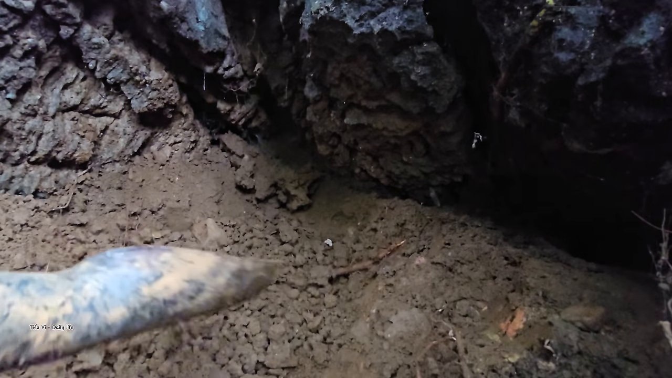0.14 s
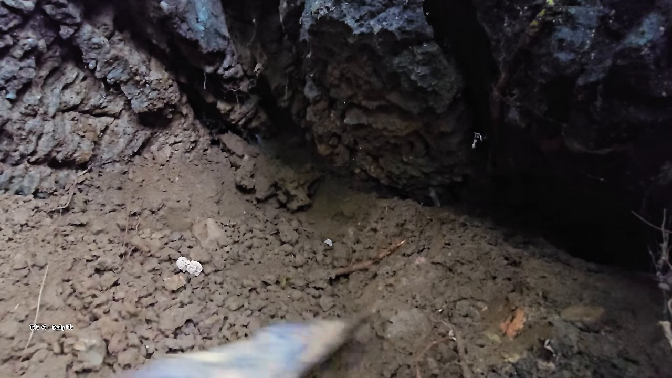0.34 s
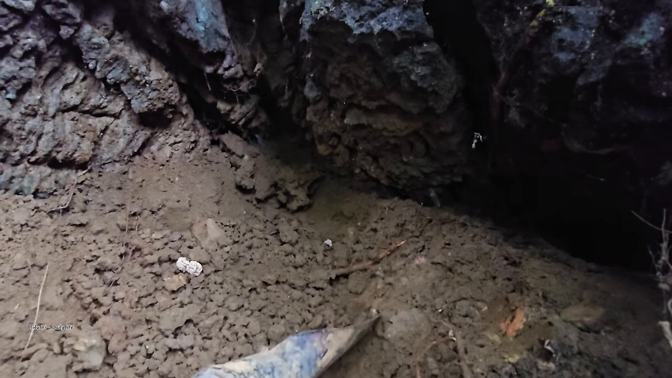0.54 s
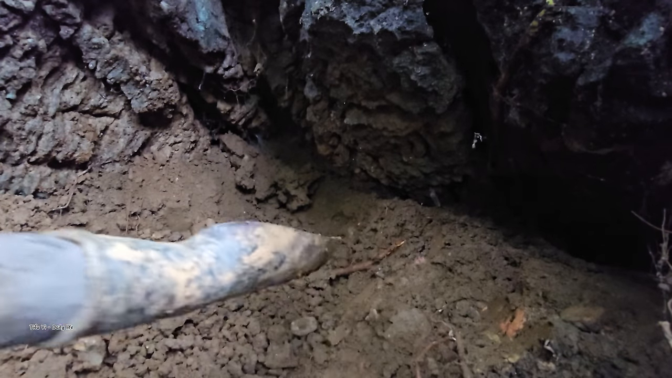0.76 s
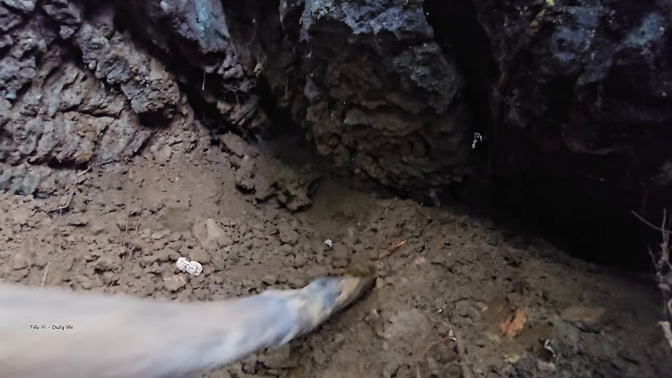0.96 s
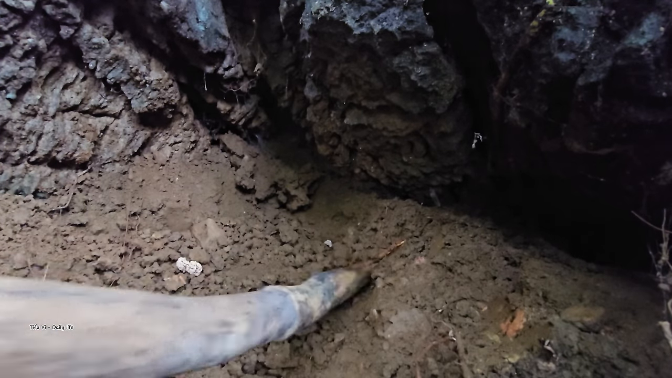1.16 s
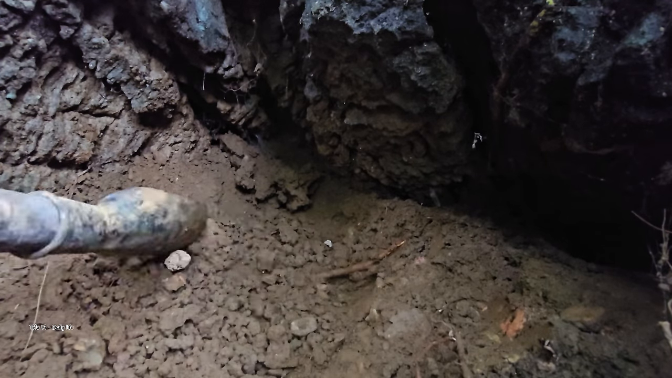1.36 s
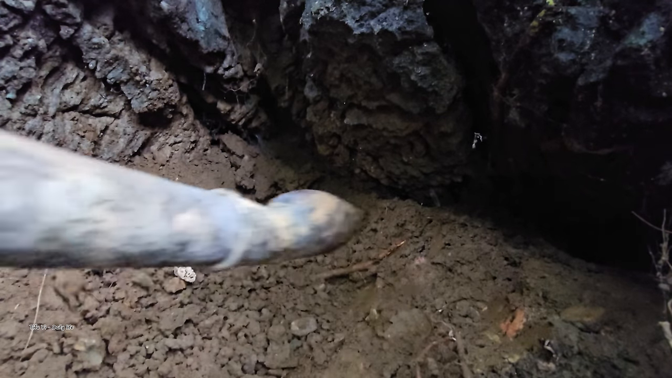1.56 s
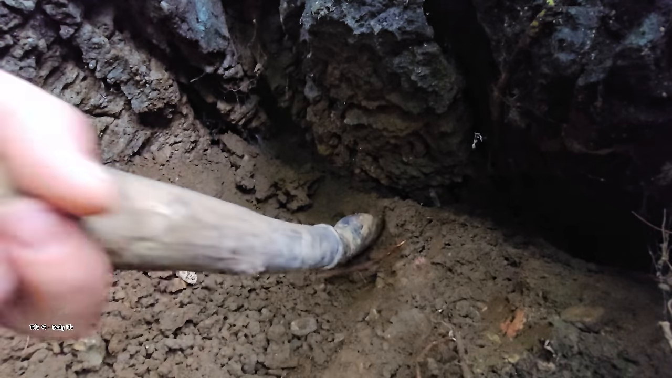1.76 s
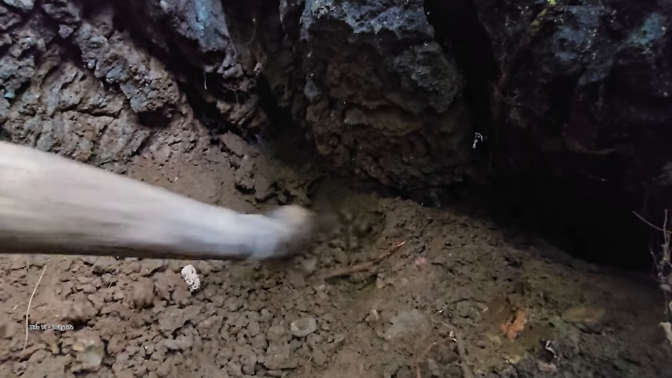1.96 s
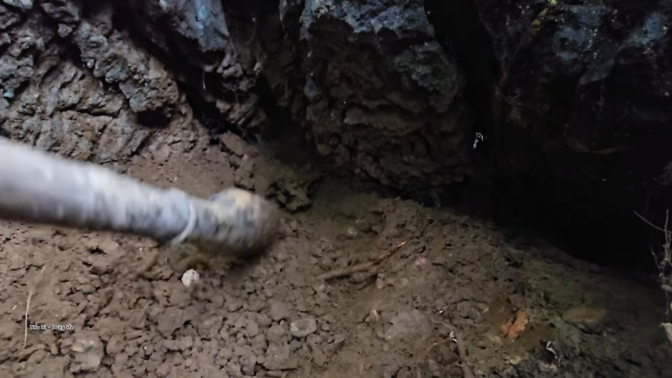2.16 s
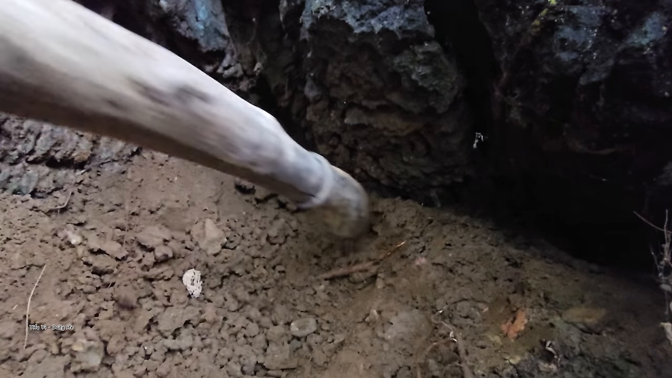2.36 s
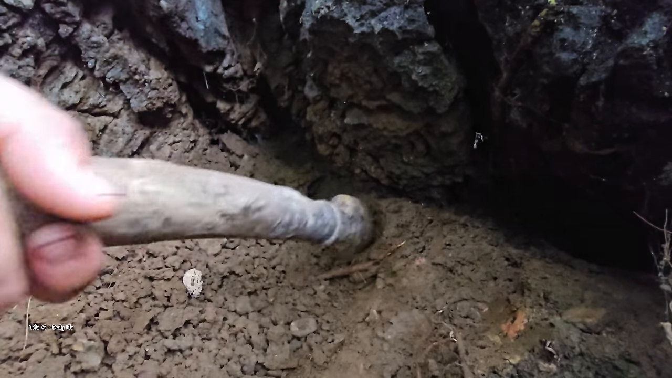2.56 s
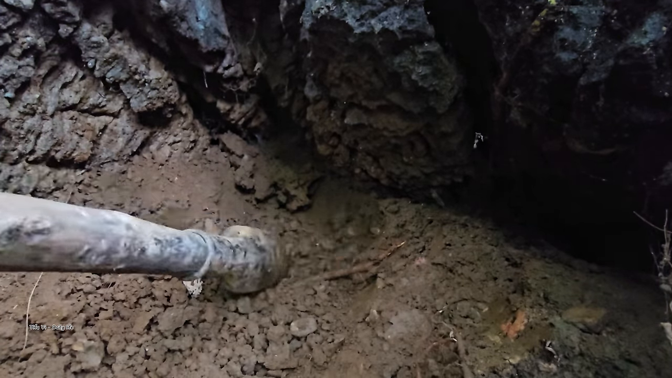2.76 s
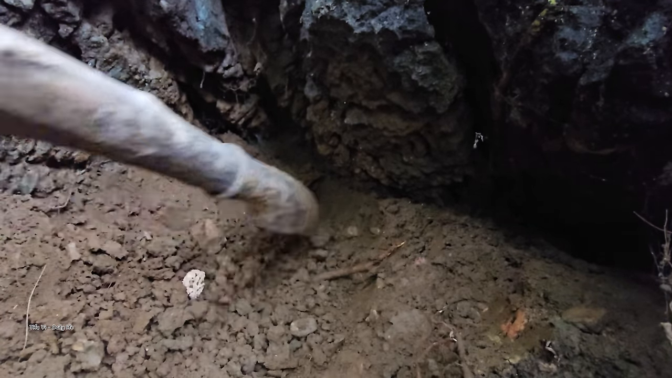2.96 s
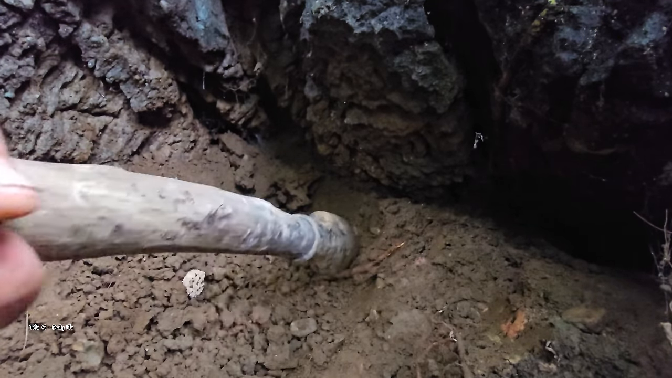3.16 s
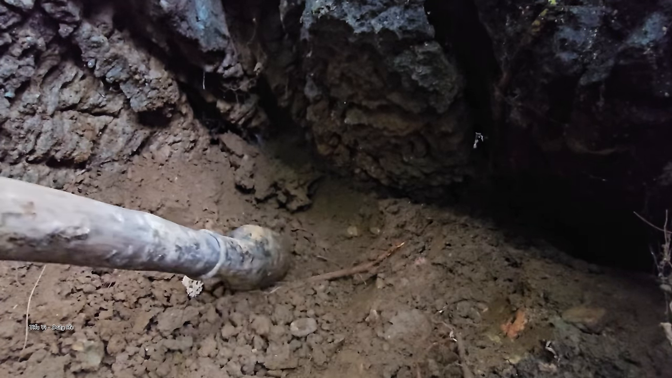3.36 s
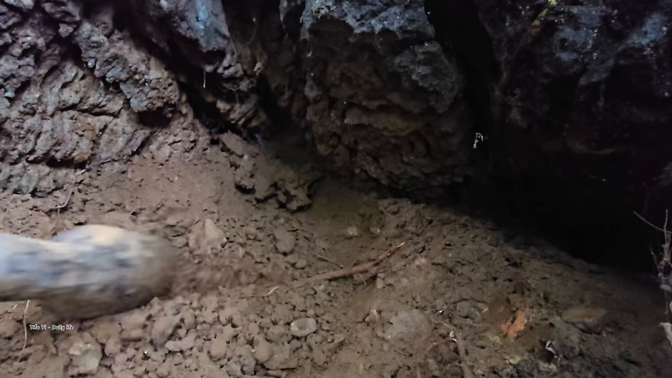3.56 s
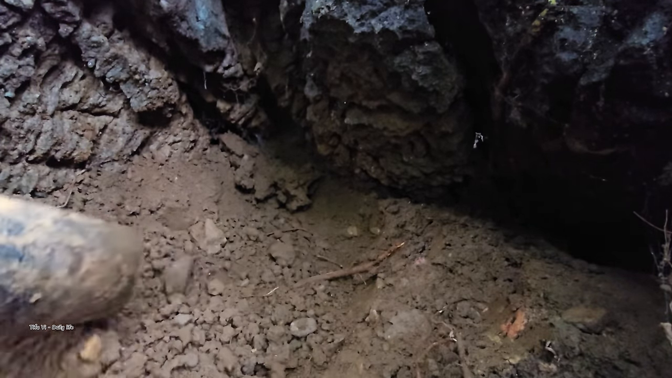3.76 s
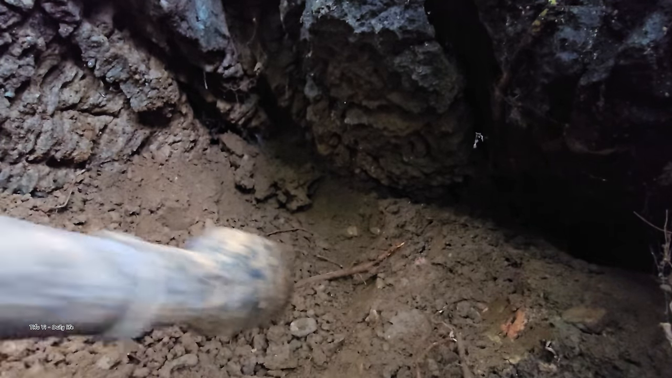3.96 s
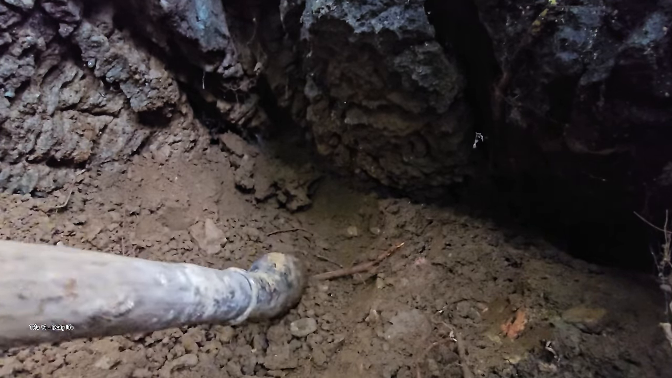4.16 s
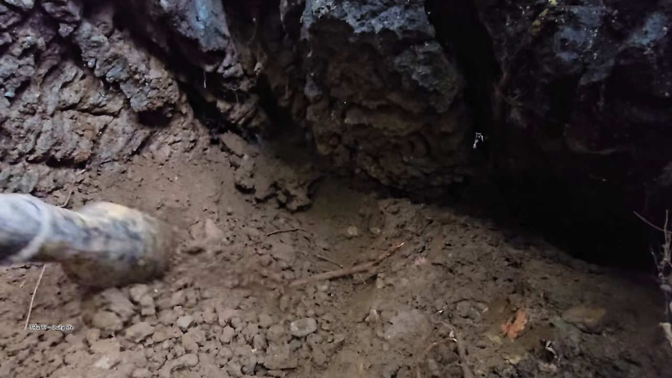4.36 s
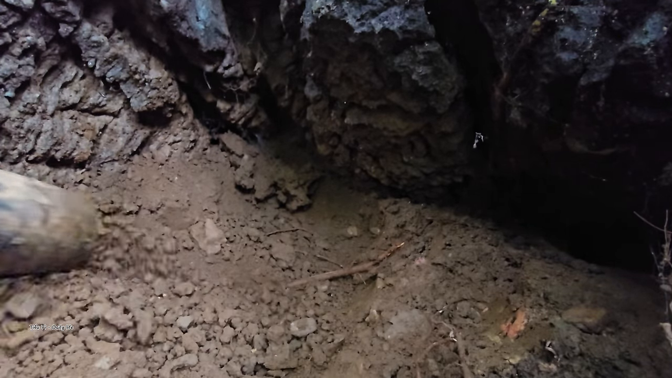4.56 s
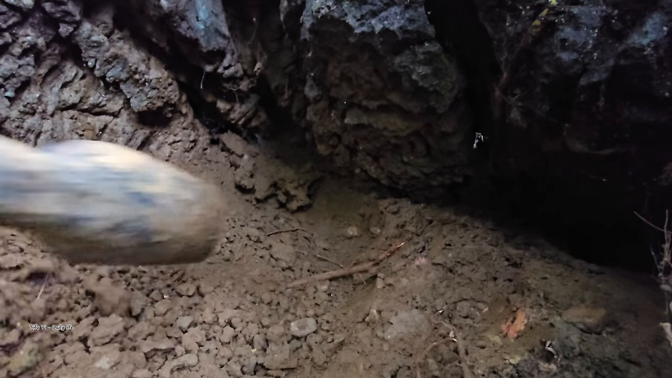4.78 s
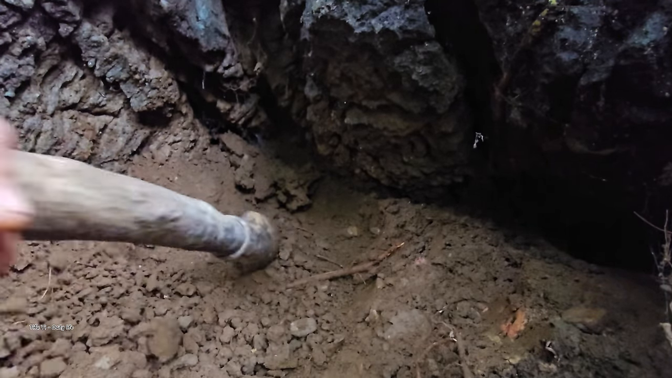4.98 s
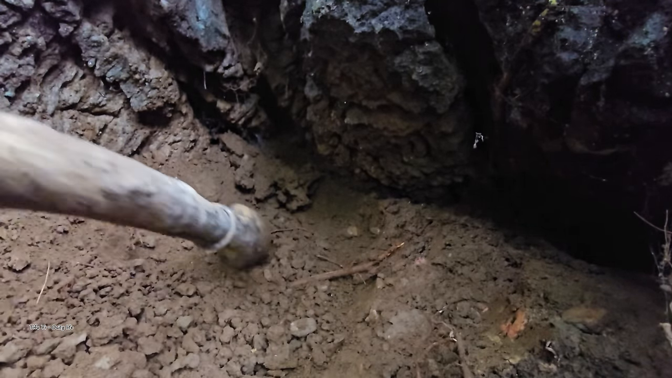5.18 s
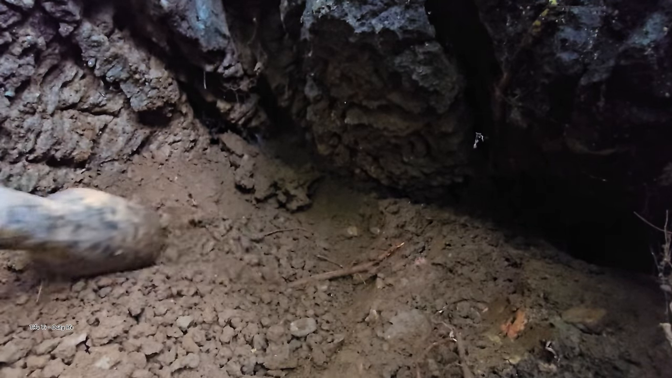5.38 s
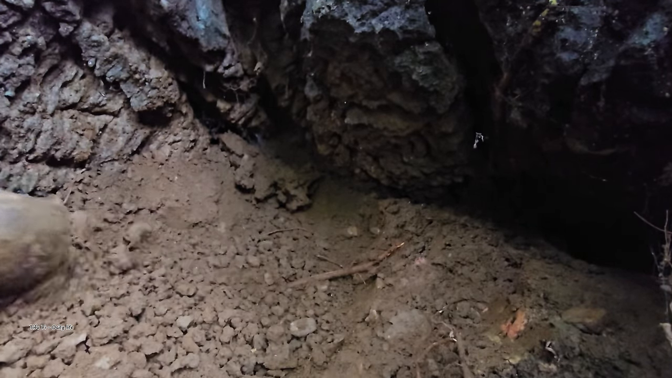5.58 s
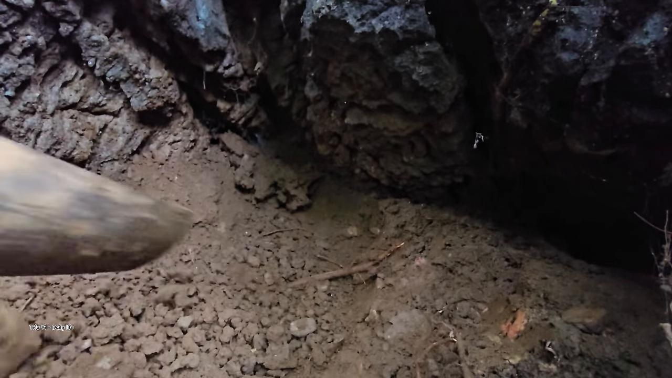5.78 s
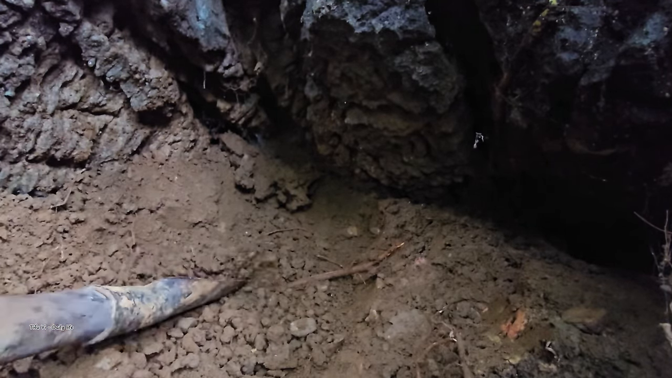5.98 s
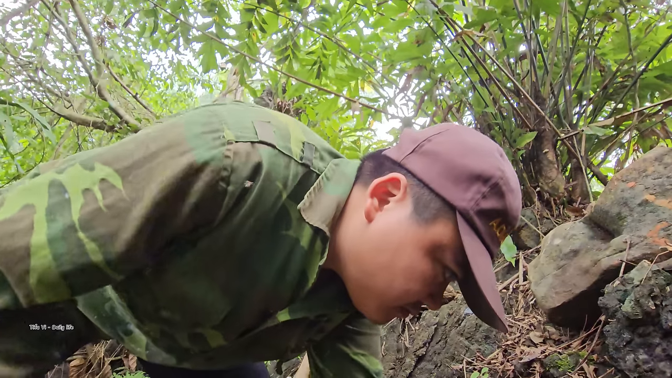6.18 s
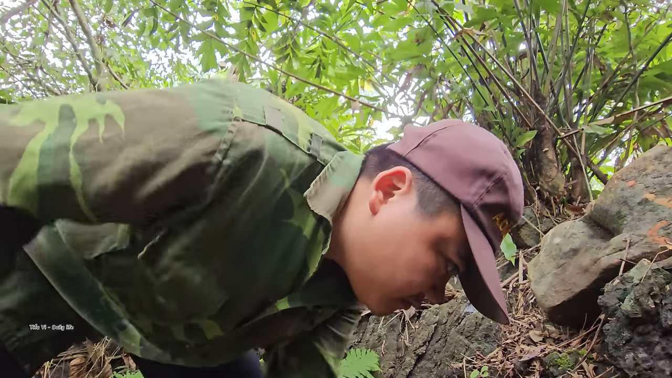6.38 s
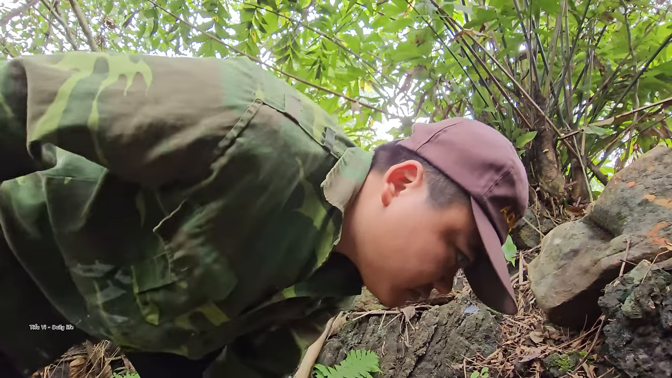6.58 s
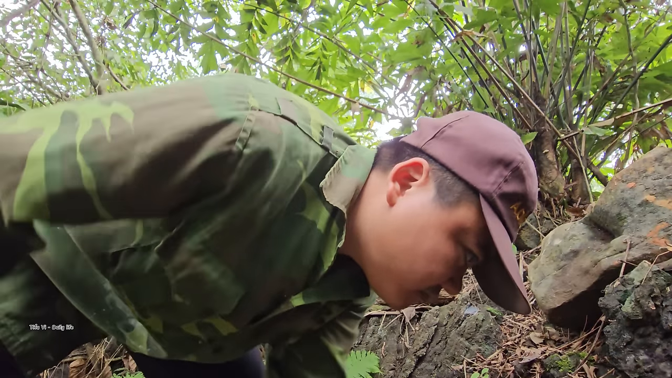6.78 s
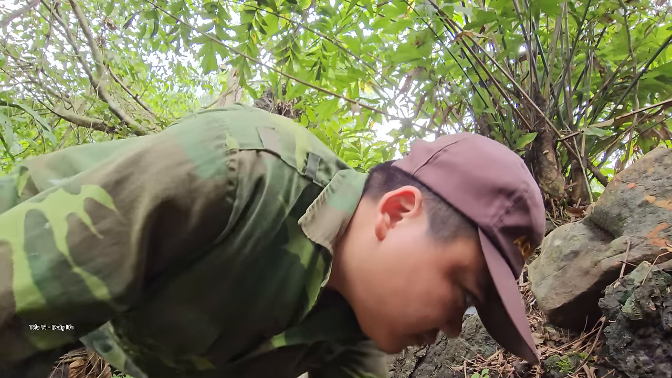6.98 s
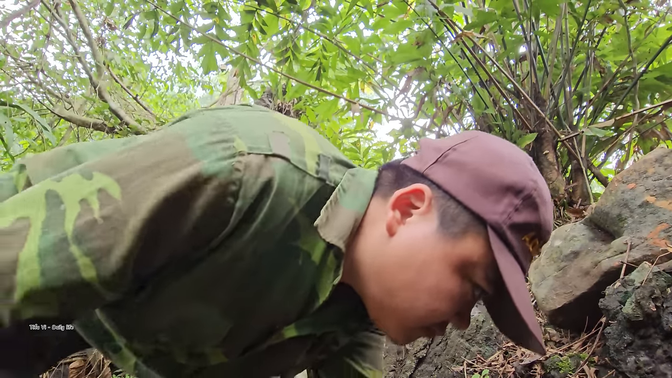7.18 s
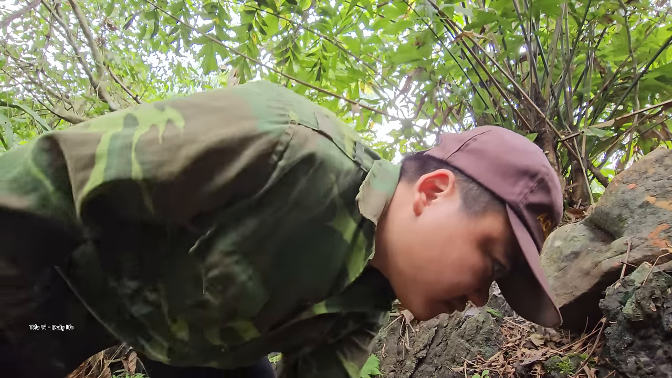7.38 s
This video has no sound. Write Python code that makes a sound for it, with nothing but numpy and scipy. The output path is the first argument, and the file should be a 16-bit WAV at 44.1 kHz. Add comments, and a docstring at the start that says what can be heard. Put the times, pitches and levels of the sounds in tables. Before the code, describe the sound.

A steel hoe chops and scrapes stony soil in uneven bursts, gritty crunches, clinks and low thumps, over a very faint forest hush.

```python
"""A soft scrape and a crunch come first: a steel hoe in stony soil, heard from inside a rocky hollow; then,
after a short silence, the microphones stand beside the digger. Blows burst as crushed grit, ring modes of
stone, blade (later rock) and shaft, and thump the ground; drags are clumped noise grains with hissing grit
and ticking pebbles. A distant bird, a trilled falling tone, calls once over the coloured noise of forest hush."""
import sys
import numpy as np
from scipy import signal
from scipy.fft import rfft, irfft
from scipy.io import wavfile
from scipy.ndimage import uniform_filter1d

SR = 44100
rng = np.random.default_rng(int(sys.argv[2]) if len(sys.argv) > 2 else 0)


def transcribe(u):
    """Save the signal u as a 16-bit wav file named by the first command-line argument.

    u: samples, shape (n,) or (channels, n), limited to [-1, 1]; the rate is SR.
    q: integer samples, one column per channel.
    """
    v = np.clip(np.atleast_2d(u).T, -1, 1)
    q = np.round(v * 32767).astype(np.int16)
    wavfile.write(sys.argv[1], SR, q)


N = 327663
SILENCE_START_S, SILENCE_END_S = 6.07, 6.163  # parts the hollow from the place beside the digger


def gain_of(db):
    """Amplitude factor of a level in dB."""
    return 10 ** (np.asarray(db) / 20)


def evened(x):
    """Scales x to a root mean square of one."""
    return x / np.sqrt(np.mean(x ** 2) + 1e-20)


def read(points, hz):
    """Reads a curve of (frequency, value) points along a logarithmic frequency axis."""
    f, value = np.transpose(points)
    return np.interp(np.log(hz + 1), np.log(f + 1), value)


def add(mix, s, sound):
    """Adds a sound to the mix from s seconds on, cut at the end of the mix."""
    part = mix[..., round(s * SR):][..., :sound.shape[-1]]
    part += sound[..., :part.shape[-1]]


def coloured(x, points):
    """Filters x by a spectrum, scaled so that white noise keeps its power."""
    gain = evened(gain_of(read(points, np.fft.rfftfreq(x.shape[-1], 1 / SR))))
    return irfft(rfft(x) * gain, x.shape[-1])


def ring(modes, t, spread_db=0.):
    """Impulse response of a struck body: a sum of sine modes that die away exponentially."""
    hz, db, t60 = np.transpose(modes)[:, :, None]
    level_db = db + np.reshape(spread_db, (-1, 1)) - 60 * t / t60
    return (gain_of(level_db) * np.sin(2 * np.pi * hz * t)).sum(0)


def gritty(count, size_db, clump):
    """Two unrelated carriers of the same uneven grains: sizes scatter, and grains come in clumps."""
    clumps = evened(uniform_filter1d(rng.standard_normal(count), int(clump), mode="wrap"))
    return evened(gain_of(size_db * clumps) * rng.standard_normal((2, count)))


# colour of crushed earth in its three parts, dull to bright: (frequency [Hz], relative density [dB per Hz])
SOIL_COLOUR = [(150, -11), (300, -8), (600, -8.5), (1000, -8), (1500, -18.5), (3000, -60.5)]
SCRAPE_COLOUR = [(600, -54.5), (1200, -8), (2000, -1.5), (2800, -1), (4000, 0.5), (5500, -4), (7000, -15),
                 (10000, -39)]
GRIT_COLOUR = [(3500, -54.5), (5500, -9), (7000, -0.5), (10000, -5.5), (12000, -6.5), (16000, -12)]
LEAD_S = .035  # crushing begins this long before the blow


def crunch(soil_db, grit_db, hz, t60, lead_db):
    """Crushed grains swell as the edge sinks in, then die away, partly heard through the ringing stone."""
    t = np.arange(8000) / SR
    after = t - LEAD_S
    # earth gives way first, then stone
    sinking = gain_of(lead_db + 60 * after / 0.049) + gain_of(60 * after / 0.0045)
    dying = gain_of(-60 * after / max(t60, .01))
    shape = np.where(after < 0, np.minimum(sinking, 1), dying)
    grains = gritty(count=len(t), size_db=1.0, clump=30.0)
    earth = coloured(grains, SCRAPE_COLOUR) + gain_of(soil_db) * coloured(grains, SOIL_COLOUR)
    burst = shape * (earth + gain_of(grit_db) * coloured(grains, GRIT_COLOUR))
    stone_mode = ring([(hz, 0, .015)], t[:1500])
    stone_mode = stone_mode[None] / np.linalg.norm(stone_mode)
    stone = signal.fftconvolve(shape * grains, stone_mode, axes=1)[:, :len(t)]
    return burst + gain_of(-4.0) * stone


# modes of the steel blade: (frequency [Hz], relative level [dB], t60 [s])
BLADE_MODES = [(1620, -6, .04), (1870, -2, .04), (2050, -14, .09), (2145, 0, .06), (2930, -8, .04),
               (3750, -2, .045), (4530, -5, .04), (5510, -7, .04), (5860, -8, .04), (6750, -10, .04),
               (7154, -12, .1), (8570, -12, .03), (11350, -14, .03)]
# modes of the rock struck after the silence: (frequency [Hz], relative level [dB], t60 [s])
SLAB_MODES = [(620, -12, .06), (795, -10, .06), (930, -12, .06), (1390, -5, .06), (1680, -5, .06),
              (2310, 0, .09), (2770, -9, .05), (3600, 0, .09), (4720, -3, .05), (5350, -5, .05)]
RING_DB = -17.5  # blade or rock re crunch


def knock(s, db, hz):
    """The first crack of the stone, and the blade or rock modes it excites."""
    t = np.arange(8000) / SR
    crack = gain_of(db - 13.5) * ring([(hz, 0, .012)], t)
    modes = BLADE_MODES if s < SILENCE_START_S else SLAB_MODES
    octaves_away = abs(np.log2(np.transpose(modes)[0] / hz))
    # modes near the stone's pitch win
    return crack + gain_of(db + RING_DB) * ring(modes, t, -5. * octaves_away)


# modes of the ground, each blow's draw scaling pitch and decay: (frequency [Hz], relative level [dB], t60 [s])
GROUND_MODES = [(132.3, -3, 0.11), (177.5, -17, 0.17), (258, -16.5, 0.085)]
# deep modes of the ground: (frequency [Hz], relative level [dB], t60 [s])
DEEP_MODES = [(78, -0.5, 0.19), (43, -8, 0.13)]


def ground_thump(thump_db, deep_db):
    """A short push smooths the onset of the dying ground modes."""
    t = np.arange(14000) / SR
    push = np.hanning(int(0.0034 * SR))
    shallow = gain_of(thump_db) * ring(GROUND_MODES, t * rng.uniform(.92, 1.2))
    deep = gain_of(deep_db) * ring(DEEP_MODES, t)
    return signal.fftconvolve(shallow + deep, push / push.sum())


# blade meets stone or clod: (time [s], crunch peak [dB], soil puff [dB re crunch], grit [dB re crunch],
# stone pitch [Hz], thump [dB], deep thump [dB], crunch t60 [s], lead-in [dB re crunch])
BLOWS = [(0.044, -21, -13, -21, 3700, -45, -44, 0.018, -45),
         (0.208, -43, -17, 5, 5570, -78, -57, 0.021, -35),
         (.39, -7.5, -4, -3, 5660, -5.5, -8.5, .041, -24.5),
         (.622, -29.5, -16, -9.5, 1590, -66, -51, 0.054, -9.5),
         (0.953, -17.5, -5.5, 1, 3600, -9.5, -38, 0.066, -18.5),
         (.964, -14, -12.5, 0.5, 6670, -20, -31.5, 0.062, -18),
         (0.975, -13, -6.5, 5, 7640, -36.5, -18.5, .051, -20.5),
         (1.001, -3, -19, -6, 3960, -17, -30.5, 0.053, -4),
         (1.145, -31, -20.5, -5, 1790, -39, -59, 0.086, -22),
         (1.188, -25.5, -1.5, -1, 4520, -29, -44.5, .042, -37),
         (1.342, -42, -8.5, -7.5, 2410, -51.5, -63, 0.11, -20.5),
         (1.763, -13, -14.5, 1, 4200, -42.5, -22, 0.06, -9),
         (1.831, -39, -15, -7, 3950, -70, -76, 0.035, -25),
         (2.002, -14.5, -13, 0.5, 4970, -29, -53.5, .04, -32),
         (2.019, -19.5, -14.5, -4.5, 4300, -13, -57, 0.054, -9),
         (2.05, -24.5, -9, 2.7, 4700, -20, -44, 0.06, -28),
         (2.094, -23, -36.5, -6.5, 5660, -48, -63, 0.087, -25),
         (2.437, -9, -10, -21, 2020, -30.5, -41, 0.036, -27),
         (2.456, -11, -6.5, -12.5, 3030, -27, -53, 0.047, -31),
         (2.48, -19, -15.5, -11.5, 3300, -27, -27, 0.055, -16),
         (2.57, -29.5, -1, -6, 3820, -36, -45, 0.084, -7),
         (2.633, -26.5, -10.5, 2, 5900, -40, -49, 0.048, -18),
         (2.653, -15.5, -10.5, -1.5, 1895, -21.5, -48, 0.074, -3),
         (2.703, -18, -8.5, -4.5, 1940, -43, -49, .052, -14),
         (2.725, -24, -29.5, -3, 2040, -45, -38, 0.066, -21),
         (2.876, -44.5, -23, -19, 1662, -67, -68.5, 0.057, -10),
         (3.097, 0, -30, -8.5, 1930, -3.5, -17, 0.015, -22.5),
         (3.149, -22.5, -29.5, -3, 3740, -44, -64, .046, -13),
         (3.176, -19, -19, 3, 7500, -57, -63.5, 0.044, -35),
         (3.186, -13, -8, 0.5, 7430, -32.5, -47, 0.05, -32),
         (3.195, -19, -8.5, -8, 2140, -26.5, -40, 0.12, -18),
         (3.213, -22, -6.5, -18, 1900, -41, -56, .093, -33),
         (3.243, -20, -5, -7.5, 1920, -26, -26.5, 0.11, -10),
         (3.43, -33.5, -20, -17, 1840, -63, -58, .065, -22),
         (3.487, -28.5, -7, -3, 4530, -53.5, -70, 0.047, -22),
         (3.513, -23, -31.5, -1.5, 4600, -45, -53, 0.07, -26),
         (3.534, -19.5, -29.5, 1.5, 4400, -36.5, -41, 0.023, -22),
         (4.028, -26.5, -6, 2.5, 4580, -57, -47.5, 0.085, -8.5),
         (4.058, -28.5, -16, -2.5, 1950, -18, -28, 0.14, -7.5),
         (4.283, -7, -35.5, -9, 1920, -18.5, -47.5, 0.05, -31),
         (4.319, -8, -20, -6.5, 1920, -14.5, -49, 0.056, -16.5),
         (4.422, -27, -29, -1, 1930, -48.5, -46, 0.03, -22),
         (4.488, -44.5, -27, 1.5, 7140, -66, -65, 0.08, -20),
         (4.836, -49.5, -10, -4, 1936, -76, -70, .06, -12),
         (4.978, -4.5, -4, -8.5, 3850, -12, -47.5, .093, -14.5),
         (4.986, -5, -3.5, -8, 2310, -39.5, -36.5, 0.046, -36),
         (5.006, -11.5, -5.5, -7, 2170, -9.5, -42, .06, -20),
         (5.034, -11.5, -12, -2, 6760, -49, -40, 0.02, -22),
         (5.114, -32, -10, -0.5, 2300, -54, -59.5, 0.038, 4),
         (5.145, -13.5, -18.5, -8.5, 4610, -33, -52.5, .028, -3.5),
         (5.17, -17, -32, 0, 6200, -37.5, -52, 0.068, -28),
         (5.214, -18.5, -31, -2.5, 6600, -25.5, -51, 0.08, -24),
         (5.227, -14.5, -18, 0.5, 2130, -35, -41.5, 0.071, -21),
         (5.247, -14, -38, -4.5, 2170, -20, -31, 0.089, -21),
         (5.316, -25.5, -27.5, -5, 2030, -32, -51, 0.053, -15),
         (5.344, -24.5, -10.5, 6.5, 2370, -25.5, -42, 0.031, -12),
         (5.474, -34.5, -37, 0, 3900, -70, -55, 0.13, -3),
         (5.532, -32, -42, 4.5, 3200, -55, -55, 0.086, -8.5),
         (5.922, -32, 3.5, 2.5, 4780, -27, -60, 0.14, -5),
         (5.939, -28.5, -9.5, 8.5, 1980, -13.5, -55.5, 0.091, -3),
         (5.96, -23, -2, 1, 7560, -27, -38, 0.063, -16), (6.174, -54, 11, -7, 1600, -32, -63, .052, -20),
         (6.222, -24, 0, -5, 1505, -26.5, -66, .085, -21),
         (6.258, -23.5, -6, -7, 2960, -35, -68, 0.069, -20), (6.324, -4, -6, -8, 1720, -57, -56, .065, -18),
         (6.343, -8, -1.5, -5, 3620, -16, -48, .06, -21),
         (6.413, -26, -6.5, -23, 1580, -25, -50, 0.049, -26),
         (6.458, -24, -8, -10.5, 2800, -20.5, -62, .068, -22),
         (6.506, -30.5, -1, -17.5, 2570, -31, -58, 0.071, -18),
         (6.685, -41, -10, 3, 8440, -74.5, -75, .057, -15), (6.745, -49, -6, -12, 1300, -70, -70, .04, -22),
         (6.962, -37, 3.5, -6, 2520, -25, -37, .06, -20), (7.211, -32.5, 4, -9, 4850, -31, -60, .046, -25),
         (7.242, -18, -4, -12, 3780, -26, -57, 0.076, -11),
         (7.266, -9.5, -26, -21, 3580, -20, -60, 0.037, -30),
         (7.319, -7, -43, -14, 2410, -50, -60, 0.03, -35), (7.359, -25, -4, -3, 3560, -54, -55, .082, -8)]
# modes of the wooden shaft: (frequency [Hz], relative level [dB], t60 [s])
SHAFT_MODES = [(298, 2, 0.061), (570, -7.5, 0.099), (1010, -13, .03)]
# added clinks, single ringing tones, short or longer, at or near blows:
# (time [s], frequency [Hz], level [dB], t60 [s])
PINGS = [(.624, 593, -45, .074), (.624, 1500, -40, .05), (1.187, 600, -41, .04), (1.192, 2050, -38, .12),
         (.391, 1250, -17, .03), (2.438, 1200, -19, .033), (2.438, 800, -22, .03), (3.099, 7154, -33, .2),
         (3.098, 3750, -17, .04), (3.19, 7154, -36, .2), (4.283, 2050, -22, .05), (4.979, 2145, -18.5, .08),
         (5.249, 2050, -24, .1), (5.54, 2050, -47, .22), (6.178, 630, -39, .08), (6.326, 1650, -17, .05),
         (6.35, 620, -28, .07), (7.259, 3600, -29, .098), (7.264, 2340, -26, .07), (7.316, 2310, -27, .063),
         (7.321, 3420, -21, .078), (7.322, 4720, -25, .05), (6.508, 800, -36, .06)]
CREST_DB = 7.5  # peak of a crunch above its mean level
SHAFT_DB = -14  # shaft re soil puff


def blows():
    """Each blow crushes grit, knocks stone, blade or rock and shaft, and pushes into the ground."""
    crunches, clinks, thumps = np.zeros((2, N)), np.zeros(N), np.zeros(N)
    t = np.arange(8000) / SR
    for s, db, soil_db, grit_db, hz, thump_db, deep_db, t60, lead_db in BLOWS:
        burst = crunch(soil_db, grit_db, hz, t60, lead_db)
        add(crunches, s - LEAD_S, gain_of(db - CREST_DB) * burst)
        add(clinks, s, knock(s, db, hz))
        add(thumps, s, gain_of(db + soil_db + SHAFT_DB) * ring(SHAFT_MODES, t))
        add(thumps, s, ground_thump(thump_db, deep_db))
    for s, *tone in PINGS:
        add(clinks, s, ring([tone], np.arange(14000) / SR))
    return crunches, clinks, thumps


# the blade drags or loose earth trickles: (start [s], length [s], first level [dB], last level [dB],
# grit [dB re scrape], rumble [dB])
STROKES = [(0, 0.086, -57.5, -51, -6, -56.5), (0.239, 0.1, -72, -60, -1, -76),
           (0.381, 0.19, -63, -69, -0.5, -57), (0.59, 0.24, -61.5, -81.5, 3.5, -59),
           (0.871, 0.047, -69, -64, -2, -61.5), (0.985, 0.047, -37, -31.5, -2.5, -38),
           (1.122, 0.068, -54.5, -36, -4.5, -48), (1.221, 0.19, -69.5, -61.5, 3.5, -53),
           (1.656, 0.16, -77, -68, 7.5, -57), (1.785, 0.024, -27.5, -39.5, -9, -24.5),
           (1.864, 0.085, -62, -52.5, -5, -50), (1.985, .015, -43, -54.5, -5, -42),
           (2.009, .12, -36, -48, -3, -37.5), (2.137, 0.14, -56, -72, -1, -56.5),
           (2.308, 0.065, -53.5, -54, 2, -79.5), (2.475, .14, -55, -41.5, -6.5, -37),
           (2.657, 0.12, -36, -52, -5.5, -37.5), (2.873, 0.12, -69.5, -70.5, 7, -58),
           (3.203, 0.076, -38.5, -38, -8.5, -38.5), (3.315, 0.23, -60, -42, -3, -45),
           (3.559, 0.2, -49.5, -65.5, -4, -47), (3.74, 0.21, -67.5, -71, 5, -59.5),
           (4.032, 0.05, -50.5, -36.5, -2.5, -33), (4.122, 0.15, -70.5, -46, -2, -42),
           (4.3, 0.15, -39, -57.5, -4.5, -36.5), (4.448, 0.24, -58.5, -70, -4.5, -59),
           (4.805, 0.095, -68.5, -74.5, 0, -66), (5.114, 0.15, -39.5, -33.5, -10.5, -40),
           (5.305, 0.044, -46, -44, -5, -39), (5.368, 0.19, -53, -50.5, 0, -56),
           (5.575, 0.35, -63, -66, 1, -60.5), (5.929, 0.032, -36.5, -30, -4, -34.5),
           (6.197, 0.11, -46.5, -40.5, -3, -37), (6.35, .16, -42, -43.5, -8.5, -41.5),
           (6.529, 0.88, -61, -64.5, -0.5, -65.5), (7.108, 0.11, -61, -47, -13, -50),
           (7.226, 0.12, -38.5, -42.5, -4.5, -34.5), (7.379, 0.053, -45, -61, -3, -43)]
BITE_DB_PER_S, LIFT_DB_PER_S = 901.5, 1101  # a stroke sets in and lets go


def strokes():
    """Gains of scrape, grit and rumble: each stroke bites, swells or fades while it lasts, and lifts off."""
    t, power = np.arange(0, N / SR, .002), 1e-12
    for start, length, first_db, last_db, grit_db, rumble_db in STROKES:
        end = start + length
        bite_db = -BITE_DB_PER_S * np.maximum(start - t, 0)
        lift_db = -LIFT_DB_PER_S * np.maximum(t - end, 0)
        scrape_db = np.interp(t, [start, end], [first_db, last_db]) + bite_db + lift_db
        rumbling_db = scrape_db + rumble_db - max(first_db, last_db)
        power = power + gain_of([scrape_db, scrape_db + grit_db, rumbling_db]) ** 2
    return [np.interp(np.arange(N) / SR, t, np.sqrt(p)) for p in power]


PEBBLES_DB, PEBBLES_PER_S = -5, 150  # level re scrape; mean rate


def pebbles(t, force):
    """Scattered pebbles of uneven size tick the blade, later the rock; six kinds weight its modes differently."""
    size = gain_of(3.5 * np.minimum(rng.exponential(1, N), 4)) * (rng.random(N) < PEBBLES_PER_S / SR)
    hits = force * evened(size)
    kind, out = rng.integers(0, 6, N), np.zeros(N)
    for k in range(6):
        for modes, when in (BLADE_MODES, t < SILENCE_END_S), (SLAB_MODES, t >= SILENCE_END_S):
            tick = ring(modes, t[:5000], 8. * rng.standard_normal(len(modes)))
            out += signal.oaconvolve(hits * when * (kind == k), tick / np.linalg.norm(tick))[:N]
    return out


# colour of the shaken ground: (frequency [Hz], relative density [dB per Hz])
RUMBLE_COLOUR = [(12, -35.5), (20, -12), (37, -12), (80, -5.5), (140, 6), (179, -5.5), (222, -10),
                 (264, -6), (400, -21), (520, -59.5), (880, -120)]
SUNG_DB = -6  # share of the drag heard through blade or rock, at full touch
SOIL_DB = -13, -7  # dull part of a drag re scrape: in the hollow, beside the digger
TOUCH_DB = -54  # well below this scrape level earth only trickles and the blade hardly sounds
GROUND_REST_DB = -65  # rumble between strokes


def drag():
    """Clumped grit under the moving blade, partly heard through its modes or the rock's, and the shaken ground."""
    t = np.arange(N) / SR
    in_hollow = t < SILENCE_END_S
    scrape_gain, grit_gain, rumble_gain = strokes()
    touch = scrape_gain / (scrape_gain + gain_of(TOUCH_DB))
    grains = gritty(count=N, size_db=2.0, clump=420.0)

    def through(modes):
        body = evened(ring(modes, t[:6000]))
        return evened(signal.oaconvolve(grains, body[None], axes=1)[:, :N])

    sung = np.where(in_hollow, through(BLADE_MODES), through(SLAB_MODES))
    earth = coloured(grains, SCRAPE_COLOUR) + gain_of(SUNG_DB) * touch * sung
    earth = earth + gain_of(np.where(in_hollow, *SOIL_DB)) * coloured(grains, SOIL_COLOUR)
    scrape = scrape_gain * earth + grit_gain * coloured(grains, GRIT_COLOUR)
    rumble = coloured(rng.standard_normal(N), RUMBLE_COLOUR)
    rumble = np.hypot(rumble_gain, gain_of(GROUND_REST_DB)) * rumble
    return scrape, rumble, pebbles(t, gain_of(PEBBLES_DB) * touch * scrape_gain)


def lumpy(x, patch_db):
    """Uneven colour of crunch and scrape: random short patches of the spectrum swell and sink."""
    z = signal.stft(x, nperseg=256, noverlap=192)[2]
    noise = rng.standard_normal(z.shape[1:])
    patches = evened(uniform_filter1d(uniform_filter1d(noise, 3, 0), 14, 1))
    gain = gain_of(patch_db * patches)
    return signal.istft(z * evened(gain), nperseg=256, noverlap=192)[1][:, :N]


def ports(pair, same, balance_db=0., lead_s=0.):
    """Two microphone ports: partly alike, with given level balance and lead of the left."""
    hz, (a, b) = np.fft.rfftfreq(N, 1 / SR), rfft(pair)
    like = np.clip(read(same, hz), -1, 1)
    tilt = gain_of(balance_db / 2)
    turn = np.exp(1j * np.pi * hz * lead_s)  # half the lead at each port
    left = a * tilt * turn
    right = (like * a + np.sqrt(1 - like ** 2) * b) / tilt / turn
    return irfft(np.array([left, right]), N)


# left-right likeness of the digging: (frequency [Hz], likeness [-1 to 1])
DIGGING_LIKENESS = [(100, 0.85), (300, 0.96), (1000, 0.71), (4000, 0.2), (15000, 0.1)]
# level of the left port over the right: (frequency [Hz], difference [dB])
BALANCE = [(60, 3.5), (130, 1), (290, -2.5), (640, 6), (1410, 1.5), (3100, 1.0), (6820, 0.5), (15000, 12)]
# lead of the left port, the hollow then beside the digger: (lead [s], lead [s])
LEFT_LEADS = 0.0004415, -0.00015


def two_places(digging):
    """The digging reaches one port earlier, first in the hollow, then beside the digger."""
    balance_db = read(BALANCE, np.fft.rfftfreq(N, 1 / SR))
    hollow, beside = (ports(digging, DIGGING_LIKENESS, balance_db, lead_s) for lead_s in LEFT_LEADS)
    return np.where(np.arange(N) < SILENCE_END_S * SR, hollow, beside)


def rocks(x):
    """A short tail of scattered reflections from rock and trunks, different at each port."""
    t = np.arange(9000) / SR
    taps = rng.standard_normal((2, len(t))) * gain_of(-60 * t / 0.06) * (t > .002)
    return signal.oaconvolve(x[None], taps / np.linalg.norm(taps[0]), axes=1)[:, :N]


# path of the distant bird's whistle: (time [s], frequency [Hz], level before the trill [dB])
BIRD = [(5.68, 4020, -76), (5.726, 3674, -60), (5.77, 3640, -66), (5.9, 3200, -66), (5.91, 3007, -61)]


def bird():
    """A falling whistle, its loudness trilled about eighty times a second."""
    s, hz, db = np.transpose(BIRD)
    t = np.arange(s[0], s[-1], 1 / SR)
    uneven = evened(uniform_filter1d(rng.standard_normal(len(t)), 400))
    trill = (1 + 0.84 * np.sin(2 * np.pi * 81.0 * t)) * gain_of(2.4 * uneven)
    phase = 2 * np.pi * np.cumsum(np.interp(t, s, hz)) / SR
    tone = np.sin(phase) * signal.windows.tukey(len(t), .1)
    out = np.zeros(N)
    add(out, s[0], np.sqrt(2) * gain_of(np.interp(t, s, db)) * trill * tone)
    return out


# colour of the forest hush: (frequency [Hz], relative density [dB per Hz])
HUSH_COLOUR = [(12, -37), (20, -0.5), (110, -5.5), (248, -20.5), (301, -22.5), (660, -26.5), (1760, -27.5),
               (2460, -32.5), (4540, -32), (6540, -49), (7520, -29.5), (9400, -52.5), (16000, -38)]
# left-right likeness of the hush: (frequency [Hz], likeness [-1 to 1])
HUSH_LIKENESS = [(60, 1), (240, 0.76), (950, -0.85), (3770, -0.34), (15000, 1)]


def hush():
    """Forest air and microphone hiss: steady coloured noise, partly alike at both ports."""
    noise = coloured(rng.standard_normal((2, N)), HUSH_COLOUR)
    return gain_of(-56) * ports(noise, HUSH_LIKENESS)


def scene():
    """Sums the digging at its two places, its reflections, the ground, the bird and the hush."""
    crunches, clinks, thumps = blows()
    scrape, rumble, ticks = drag()
    digging = lumpy(crunches + scrape, patch_db=3.5)
    digging = digging + (clinks + ticks) * np.array([[1], [0]])  # only in the carrier both ports share
    ground = (thumps + rumble) * gain_of([[.7], [-.7]])  # slightly louder on the left
    reflections = gain_of(-14) * rocks(digging[0])
    return two_places(digging) + reflections + ground + bird() + hush()


def record(dry):
    """A brief silence parts the two microphone places; the microphone drops the lowest bass; the band is limited."""
    t = np.arange(N) / SR
    closing = np.clip((SILENCE_START_S - t) / 0.0035, 0, 1)
    opening = np.clip((t - SILENCE_END_S) / 0.0032, 0, 1)
    bass_cut = signal.butter(4, 42., "high", fs=SR, output="sos")
    heard = signal.sosfilt(bass_cut, dry) * (closing + opening)
    band_limit = signal.firwin(511, 16000, window=("kaiser", 9), fs=SR)
    return signal.oaconvolve(heard, band_limit[None], "same")


dry = scene()
out = record(dry)
transcribe(out)
```